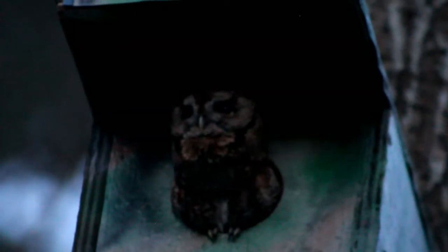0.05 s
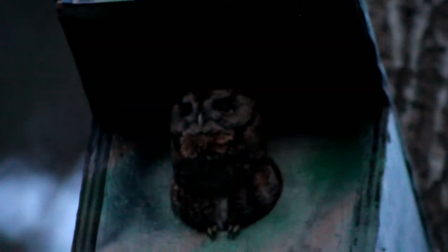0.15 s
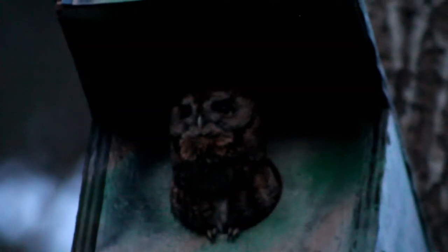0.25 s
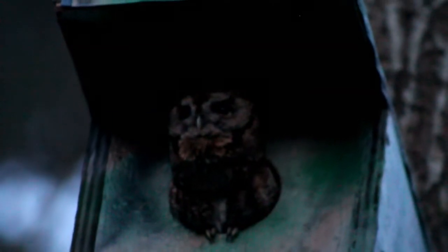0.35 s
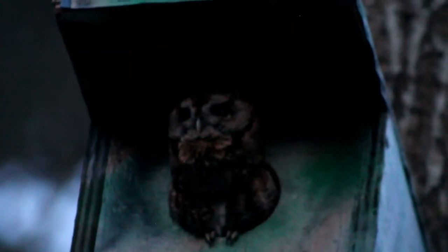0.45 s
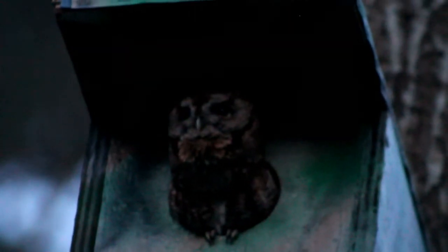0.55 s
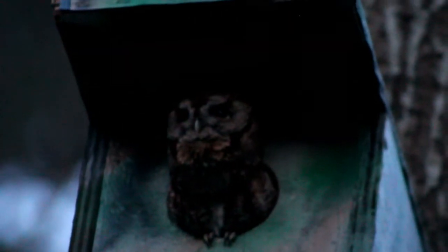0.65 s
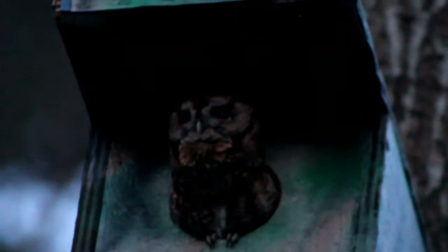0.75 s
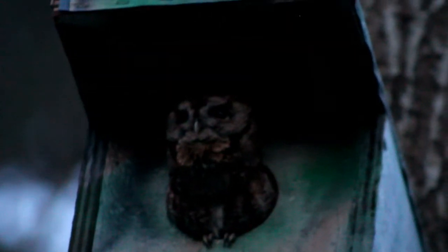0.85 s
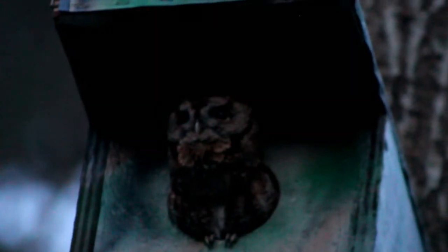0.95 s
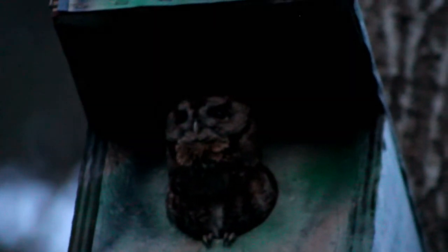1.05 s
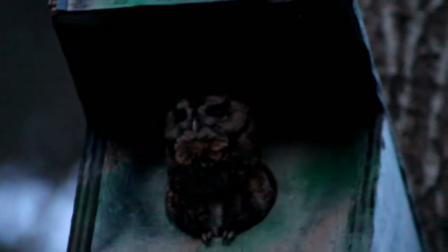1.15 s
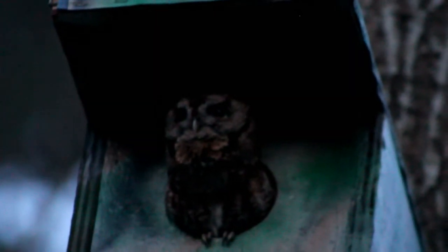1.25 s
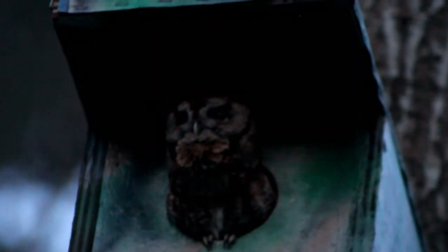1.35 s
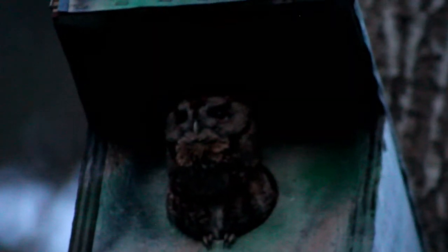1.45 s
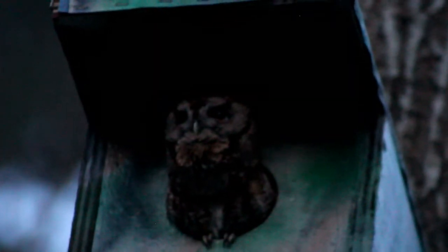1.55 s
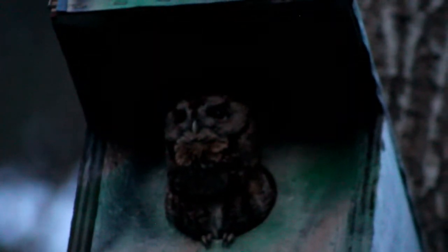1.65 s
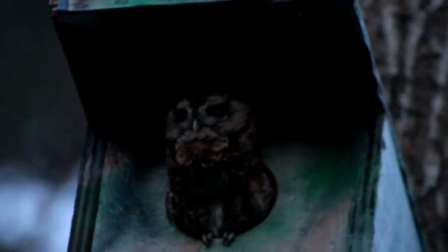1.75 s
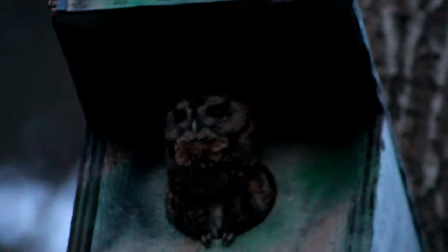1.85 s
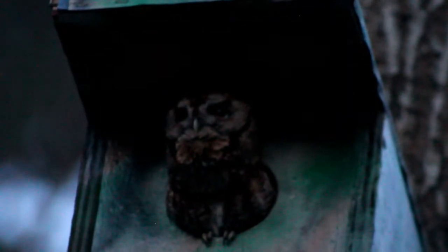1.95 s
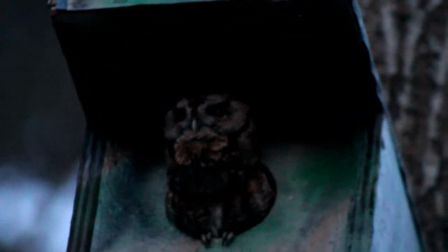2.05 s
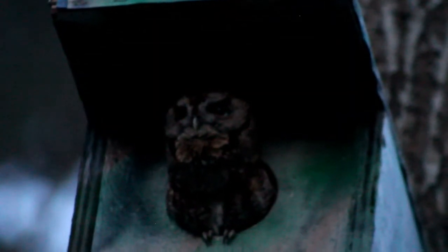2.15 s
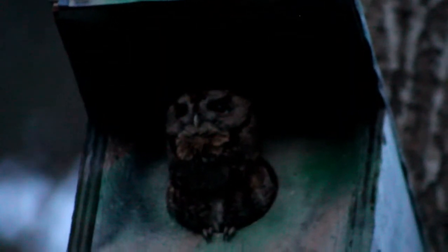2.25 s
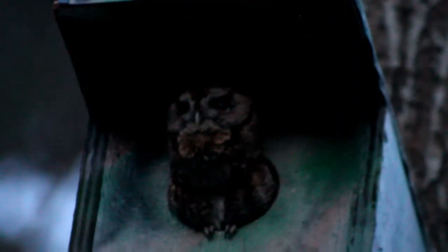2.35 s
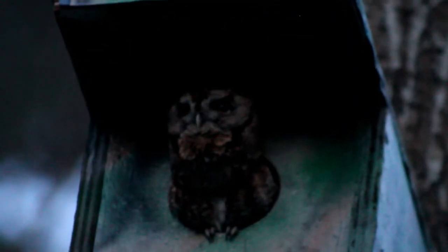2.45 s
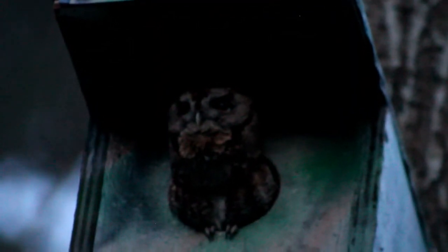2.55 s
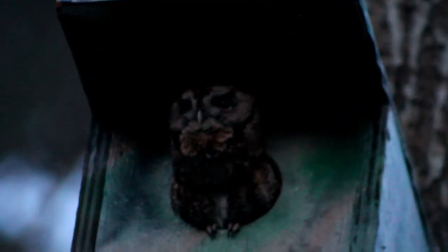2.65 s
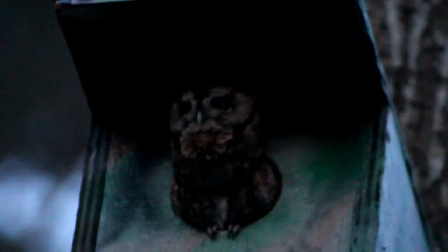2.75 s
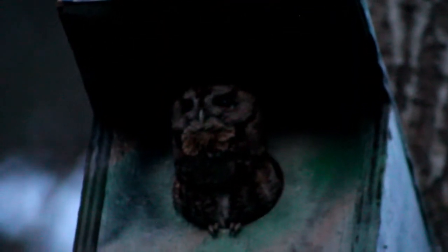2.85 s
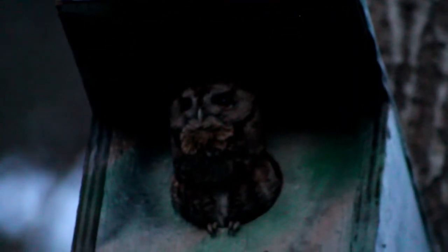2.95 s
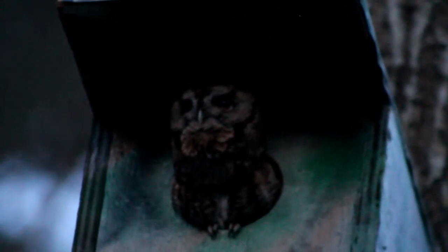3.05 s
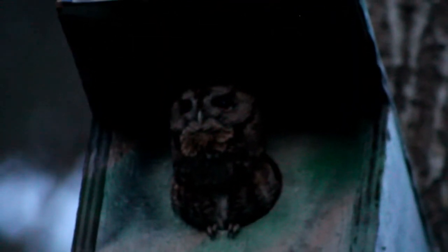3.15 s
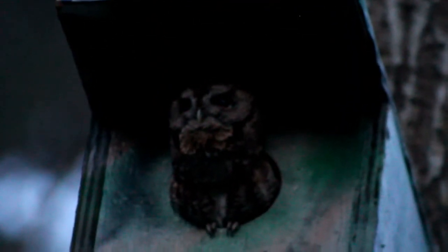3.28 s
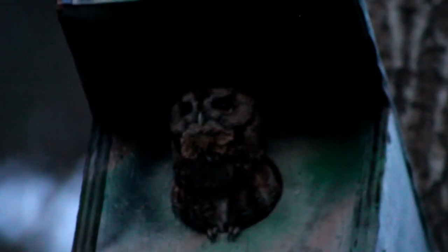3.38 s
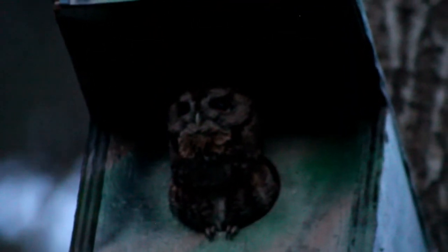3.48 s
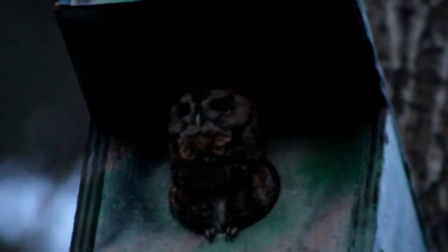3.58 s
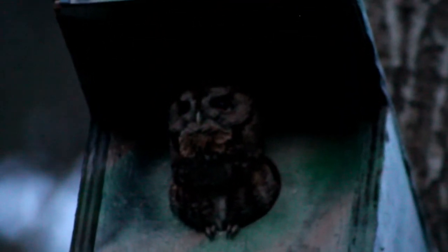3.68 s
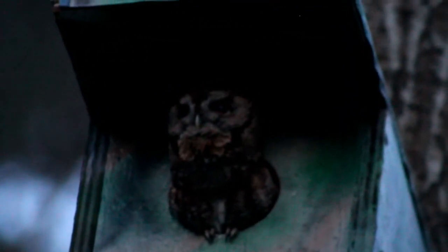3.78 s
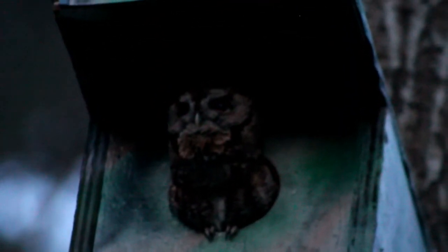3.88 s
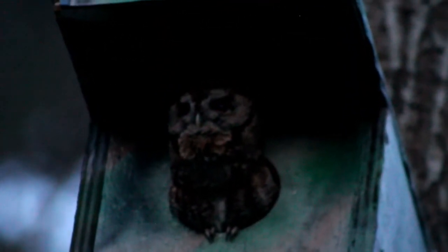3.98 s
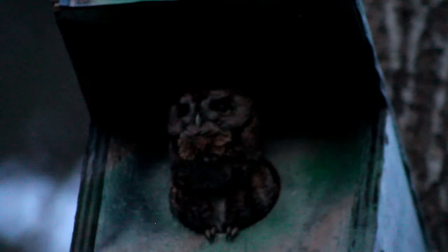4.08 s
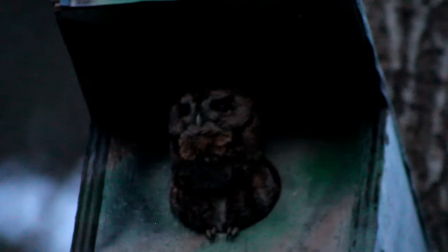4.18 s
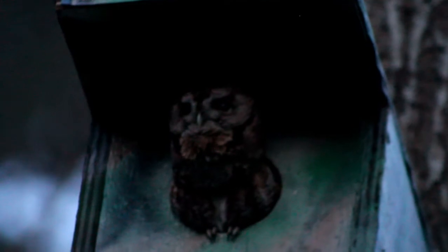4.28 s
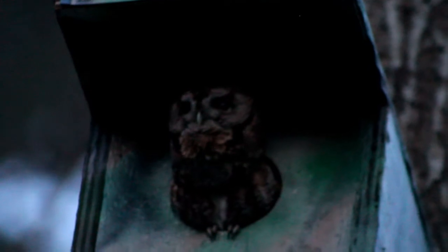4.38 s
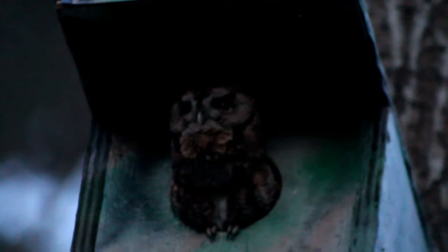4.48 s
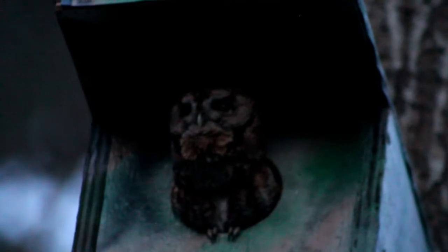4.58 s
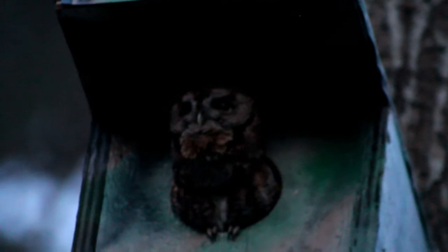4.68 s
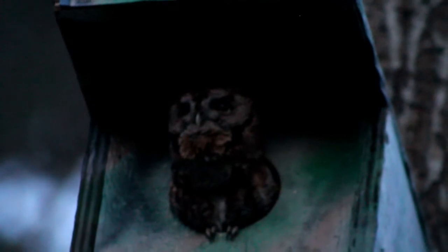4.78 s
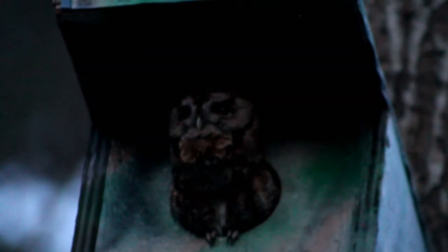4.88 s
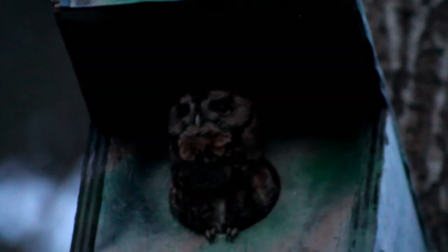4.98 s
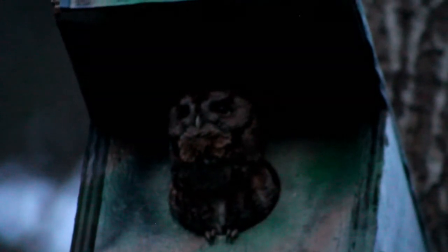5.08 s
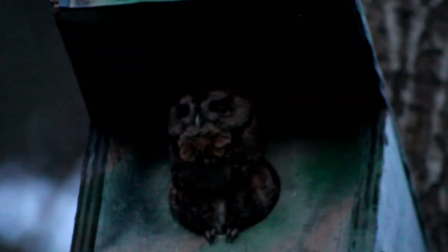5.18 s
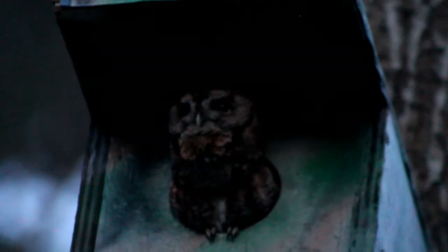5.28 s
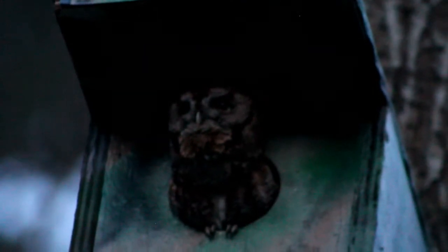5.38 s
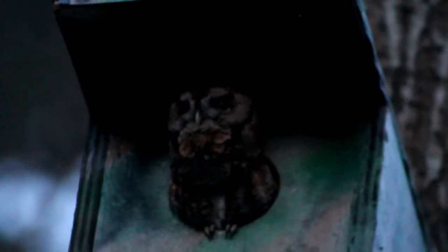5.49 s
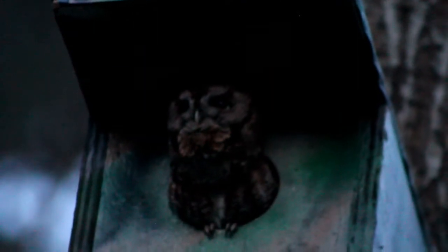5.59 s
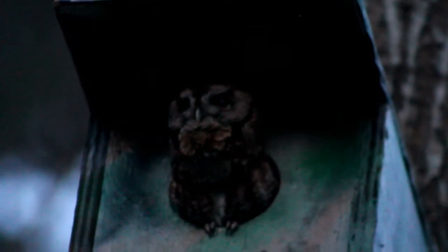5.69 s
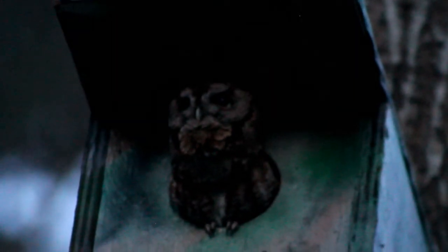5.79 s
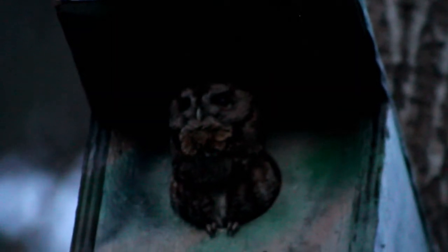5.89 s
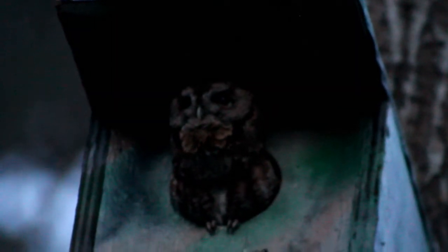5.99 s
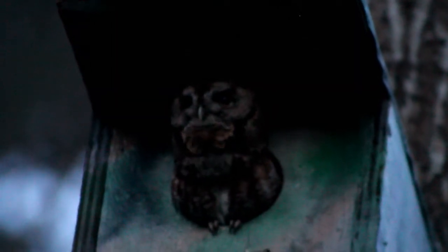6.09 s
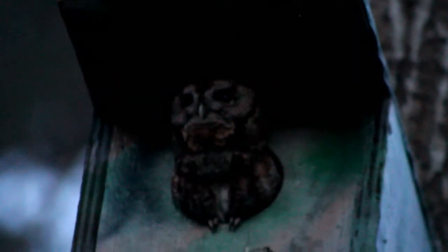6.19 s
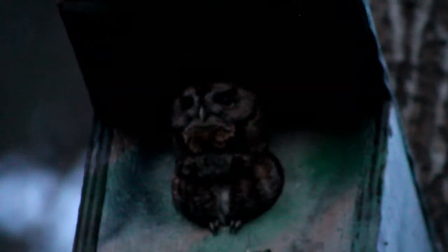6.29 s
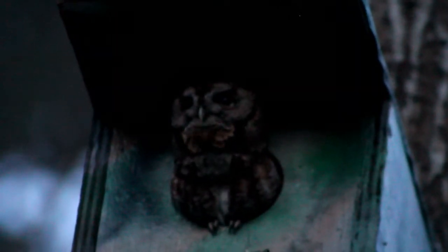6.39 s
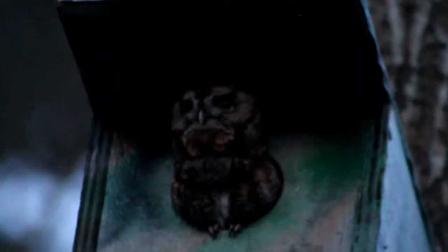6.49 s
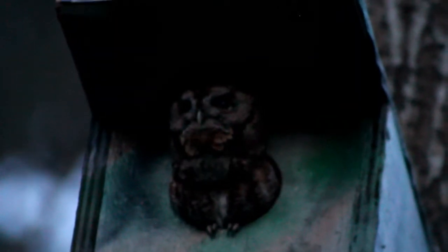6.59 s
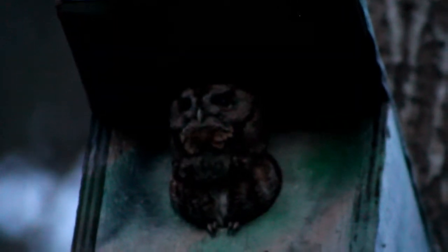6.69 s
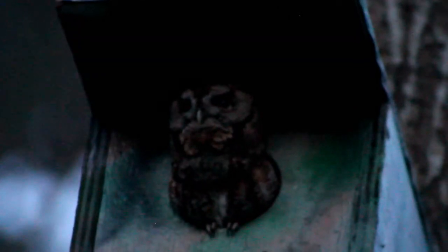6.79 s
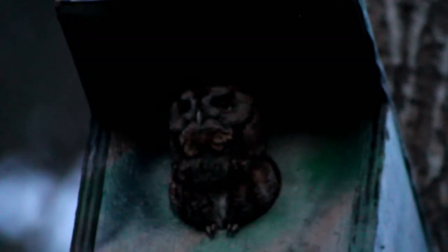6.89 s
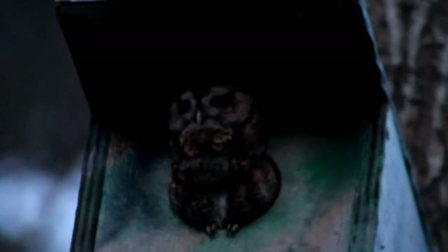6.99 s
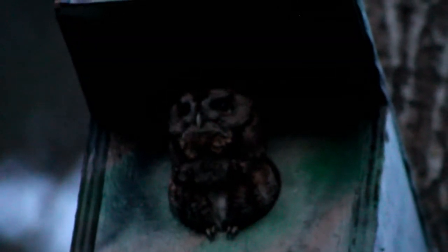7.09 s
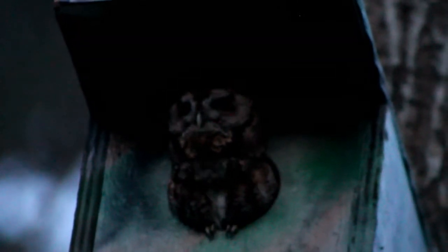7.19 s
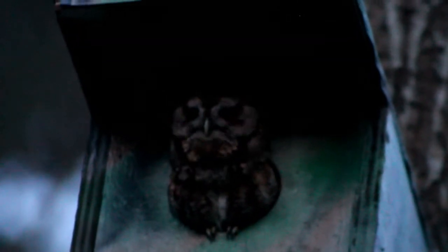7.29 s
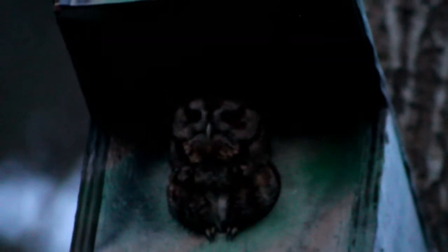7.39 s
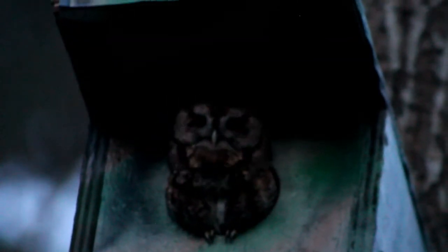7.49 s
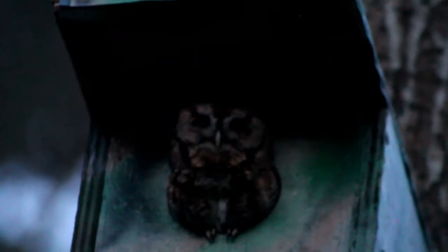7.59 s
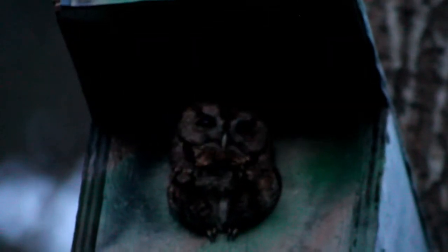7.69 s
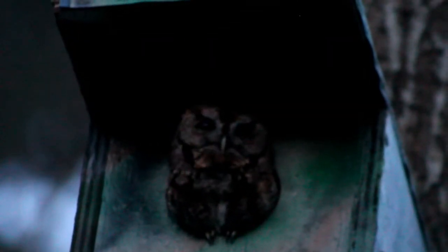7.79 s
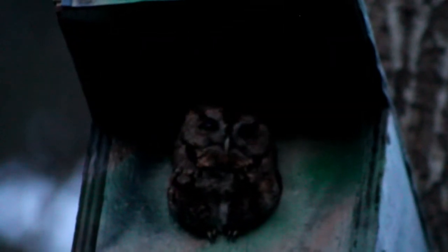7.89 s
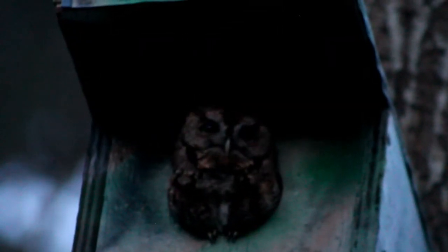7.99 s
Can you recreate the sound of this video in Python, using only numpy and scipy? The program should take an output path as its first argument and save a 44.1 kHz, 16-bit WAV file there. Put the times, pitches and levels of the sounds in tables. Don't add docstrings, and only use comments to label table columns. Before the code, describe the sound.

Soft hollow owl hoots pulse about fourteen a second for six seconds at dusk, over faint traffic hush and thin distant chirps.

```python
import sys
import numpy as np
from scipy import signal
from scipy.io import wavfile
from scipy.ndimage import uniform_filter1d

SR = 44100
rng = np.random.default_rng(int(sys.argv[2]) if len(sys.argv) > 2 else 0)


def gain_from_decibels(decibels):
    exponent = np.asarray(decibels, float) / 20
    return 10 ** exponent


def unload_wav(signal):
    wavfile.write(
        sys.argv[1],
        SR,
        np.round(np.clip(np.atleast_2d(signal).T, -1, 1) * 32767).astype(np.int16),
    )


N = 354563


def evened(x):
    return x / np.sqrt(np.mean(x ** 2) + 1e-20)


def read(points, hz):
    f, value = np.transpose(points)
    return np.interp(np.log(hz + 1), np.log(f + 1), value)


def add(mix, s, sound):
    part = mix[max(round(s * SR), 0):][:len(sound)]
    part += sound[:len(part)]


# f/Hz, density/dB per Hz
AIR_SPECTRUM = [(20, -22), (45, -15.5), (80, -9.5), (130, -8), (220, -2), (330, -5), (620, -1.5),
                (950, -4.5), (1400, -9.5), (2000, -14), (3500, -17), (6000, -20.5), (10500, -29),
                (15500, -41.5)]
# t/s, level/dB, extra level of the road roar/dB
WASH_LEVEL = [(0, -62, -1), (2, -62.5, -1), (4, -62, -1.5), (6, -63, 1.5), (7, -62.5, -0.5),
              (8.1, -63, 0.5)]
# f/Hz, share of the roar [0-1]
ROAR_SHARE = [(250, 0), (500, 0.8), (800, 0.6), (2000, 0.2)]


def wash(patchy_db=0.3):
    size, hop = 2048, 512
    frames, hz = N // hop + 5, np.fft.rfftfreq(size, 1 / SR)
    real, imag, patches = rng.standard_normal((frames, len(hz), 3)).T
    patches = uniform_filter1d(patches, size=20, axis=0)
    patches = evened(uniform_filter1d(patches, size=10, axis=1))
    s, level_db, roar_db = np.transpose(WASH_LEVEL)
    roar = read(ROAR_SHARE, hz)[:, None] * np.interp(np.arange(frames) * hop / SR, s, roar_db)
    spectra = (real + 1j * imag) * gain_from_decibels(read(AIR_SPECTRUM, hz)[:, None] + patchy_db * patches + roar)
    noise = signal.istft(spectra, nperseg=size, noverlap=size - hop)[1][:N]
    return gain_from_decibels(np.interp(np.arange(N) / SR, s, level_db)) * evened(noise)


def drone(rows):
    s, hz, db = np.transpose(rows)
    t = np.arange(N) / SR
    level = gain_from_decibels(np.interp(t, s, db, right=-95)) * np.sqrt(2)
    return level * np.sin(2 * np.pi * np.cumsum(np.interp(t, s, hz)) / SR)


# t/s, firing f/Hz, level/dB
ENGINE_COURSE = [
    (0.0, 90.7, -75),
    (0.93, 92.3, -77.5),
    (1.04, 92.5, -87),
    (1.13, 93, -73),
    (2.44, 95, -78),
    (3.69, 100.4, -76),
    (3.97, 93.7, -77.5),
    (4.32, 80.3, -79),
    (4.92, 78.1, -100),
    (5.0, 75, -83),
]


def engine():
    return drone(ENGINE_COURSE)


# t/s, tone f/Hz, level/dB
MOTOR_COURSE = [
    (0, 122, -84),
    (3.6, 123, -84),
    (3.9, 125, -78.5),
    (5.5, 123, -80.5),
    (5.9, 118, -80),
    (6.8, 117, -82),
    (7, 121, -86),
    (8.04, 121, -87),
]


def motor():
    return drone(MOTOR_COURSE)


def resonate(x, hz, width_hz):
    turn = np.exp(2j * np.pi * np.cumsum(hz * np.ones(len(x))) / SR)
    r = np.exp(-np.pi * width_hz / SR)
    return 2 * (turn * signal.lfilter([1 - r], [1, -r], x / turn)).real


# f/Hz, width/Hz, level/dB
HUM_TONES = [
    (50, 1.5, -88),
    (81, 1.5, -91),
    (10015, 2.5, -107),
]


def hums():
    total = np.zeros(N)
    for hz, width_hz, db in HUM_TONES:
        once = resonate(rng.standard_normal(N), hz, width_hz)
        total += gain_from_decibels(db) * evened(resonate(once, hz, width_hz))
    return total


def scatter(seconds, gap=20):
    slots = round(seconds * SR) // gap
    taps, draw = np.zeros((slots, gap)), rng.random((slots, 2))
    taps[np.arange(slots), (draw[:, 0] * gap).astype(int)] = np.sign(draw[:, 1] - .5)
    return taps.ravel()


def chip(db, from_hz, to_hz, hold, t60, sweep_s=.009, bend=0.56):
    t = np.arange(round(sweep_s * SR)) / SR
    rise = np.sin(bend * t / sweep_s) / np.sin(bend)
    phase = 2 * np.pi * np.cumsum(from_hz + (to_hz - from_hz) * rise) / SR
    sweep = signal.windows.tukey(len(t), .4) * np.sin(phase)
    taps = scatter(.4, gap=60)
    taps = taps * gain_from_decibels(2.7 * rng.standard_normal(len(taps)))
    age = np.arange(len(taps)) / SR
    taps = taps * (1 + 0.26 * np.exp(-age / 0.046))
    cloud = 0
    for part, stay, slow in ((1 - rise ** 2, .75, .75), (rise ** 2, 1.1, 1.3)):
        decay = gain_from_decibels(-60 * (age - hold * stay).clip(0) / (t60 * slow))
        cloud = cloud + signal.fftconvolve(sweep * part, taps * decay)
    return gain_from_decibels(db) * cloud / np.sqrt(np.mean(cloud[:round(hold * SR)] ** 2))


# t/s, level/dB, sweep start f/Hz, sweep end f/Hz, even scatter/s
CHIPS_HEARD = [(.002, -73.5, 5960, 8070, 0.1), (.13, -78, 6940, 7630, .05), (0.686, -70, 5740, 8000, 0.1),
               (1.568, -70.5, 5900, 8040, 0.11), (2.19, -79, 6500, 7850, .06),
               (3.386, -76.5, 6500, 7770, 0.18), (4.985, -77, 5770, 7960, 0.15),
               (5.15, -77, 6460, 7330, 0.065), (5.72, -84, 5360, 6200, 0.071),
               (6.123, -71.5, 6240, 7800, 0.11), (7.362, -69.5, 6060, 8070, 0.12),
               (7.71, -81, 7700, 8600, .07), (7.89, -82.5, 6570, 7500, .1)]
# level/dB, t60/s
CHIP_DECAY = [(-78, .21), (-70, .36)]


def far_birds():
    out = np.zeros(N)
    for s, db, from_hz, to_hz, hold in CHIPS_HEARD:
        t60 = np.interp(db, *np.transpose(CHIP_DECAY))
        add(out, s, chip(db, from_hz, to_hz, hold, t60))
    return out


def ring(hz, db, t60, rise_s):
    t = np.arange(round(.1 * SR)) / SR
    return gain_from_decibels(db - 60 * t / t60) * (1 - np.exp(-t / rise_s)) * np.sin(2 * np.pi * hz * t)


def hoot(db, hz, ms, glide, skew, roundness=1.48):
    onset_hz, onset_ms = 270, 1.5
    octave_db, twelfth_db = -31.8, -43
    t = np.arange(round(ms / 1000 * SR)) / SR
    swell = np.sin(np.pi * (t / t[-1]) ** skew).clip(0) ** roundness
    bend = glide * (.71 * t + .36 * t ** 2 / t[-1]) + onset_hz * np.exp(-1000 * t / onset_ms)
    pitch = hz + bend - np.average(bend, weights=swell ** 2)
    phase = 2 * np.pi * np.cumsum(pitch) / SR
    upper = gain_from_decibels(octave_db) * np.sin(2 * phase) + gain_from_decibels(twelfth_db) * swell * np.sin(3 * phase)
    return gain_from_decibels(db) * swell * (np.sin(phase) + np.sqrt(swell * 2 * t / t[-1]) * upper)


# middle of the hoot t/s, hoot number, effort level/dB, pitch f/Hz
TRILL_COURSE = [(0.0388, 0, -39.1, 794.3), (0.406, 5, -37.6, 797.0), (1.0688, 14, -37.9, 794.5),
                (2.0181, 27, -36.6, 794.7), (2.8909, 39, -37.7, 791.5), (3.1839, 43, -36.7, 792.5),
                (3.914, 53, -37.2, 790.9), (4.6409, 63, -37.3, 788.8), (5.1474, 70, -37.1, 789.7),
                (5.7327, 78, -39.3, 785.5), (5.8809, 80, -41.1, 789.2), (6.031, 82, -41.6, 798.6)]
# hoot number, level/dB
HOOT_ACCENTS = [(4, -0.9), (10, -0.8), (16, -1.4), (17, 1.0), (20, 0.6), (21, -0.8), (28, -0.8), (32, -0.8),
                (33, -0.7), (36, -0.6), (38, 0.6), (40, 0.7), (42, 0.9), (45, -0.7), (51, 0.5), (55, -0.8),
                (63, -0.8), (64, -0.7), (65, 0.9), (66, 0.6), (69, -1.1), (70, -1.1), (71, 0.6), (75, -1.4),
                (76, 1.5)]
# t/s, lean (under 1 is early), length/ms
SWELL_LEAN = [(0, .95, 45), (.45, .88, 44.6), (5.1, .84, 44.5), (5.7, .72, 45.5), (6.04, .8, 49)]
# t/s, level/dB, f/Hz, length/ms, glide/Hz per s, lean
HOOT_WOBBLE = (.0003, .2, 1.0, .9, 120, .045)


def hoots():
    hz_per_db, ms_per_db, glide_hz_per_s = 1.9, 1.0, -1200
    echo_gain_db = .4
    mid_s, number, effort_db, pitch_hz = np.transpose(TRILL_COURSE)
    k = np.arange(number[-1] + 1)
    s, db, hz = (np.interp(k, number, v) for v in (mid_s, effort_db, pitch_hz))
    accents = dict(HOOT_ACCENTS)
    push = np.array([accents.get(n, 0) for n in k])
    when, *shape = np.transpose(SWELL_LEAN)
    lean, ms = (np.interp(s, when, v) for v in shape)
    rows = np.transpose([s, db + push - echo_gain_db, hz + hz_per_db * push, ms + ms_per_db * push,
                         glide_hz_per_s + 0 * s, lean])
    rows = rows + HOOT_WOBBLE * rng.standard_normal(rows.shape)
    lead = rows[:, 3] / 1000 * .5 ** (1 / rows[:, 5]) ** .58
    return np.column_stack([rows[:, 0] - lead, rows[:, 1:]])


# lead on the hoot t/s, f/Hz, level re hoot/dB, t60/s, rise/s
AIRWAY_POP = [(.00173, 714, -9, .016, .0015), (.00226, 1023, -12.5, .03, .0045)]
# delay t/s, level/dB
NEAR_ECHOES = [
    (.01373, -20.5),
    (.0267, -22.3),
]


def owl():
    grove_db, grove_t60 = -27.5, .25
    dry, rows = np.zeros(N), hoots()
    for (s, db, *shape), (size, tune) in zip(rows, rng.random((len(rows), 2))):
        add(dry, s, hoot(db, *shape))
        for lead, hz, pop_db, t60, rise in AIRWAY_POP:
            add(dry, s - lead, ring(hz * (.98 + .04 * tune), db + pop_db + 4 * (size - .5), t60, rise))
    out = dry.copy()
    for delay, db in NEAR_ECHOES:
        add(out, delay, gain_from_decibels(db) * dry)
    t = np.arange(SR // 2 // 20 * 20) / SR
    for k in range(3):
        tail = scatter(.5) * gain_from_decibels(-60 * t / grove_t60) * (t > .022)
        turn = np.sqrt(2 / 3) * np.sin(np.pi * (np.arange(N) / SR / 0.63 + k / 3))
        out += gain_from_decibels(grove_db) * signal.fftconvolve(dry * turn, tail / np.linalg.norm(tail))[:N]
    return out


# t/s, peak level/dB, ring f/Hz, t60/s
CAMERA_TICKS = [
    (.108, -66, 9000, 0.0022),
    (2.336, -67, 11000, .002),
    (2.6685, -48, 634, .04),
    (3.397, -68, 11000, 0.0018),
    (4.301, -63, 11000, .002),
    (4.752, -52, 9500, 0.0022),
    (4.7522, -60, 12500, .002),
    (7.231, -49.5, 900, 0.016),
]


def camera_ticks():
    out = np.zeros(N)
    for s, db, hz, t60 in CAMERA_TICKS:
        add(out, s, ring(hz, db, t60, rise_s=.0001))
    return out


# f/Hz, level/dB, t60/s
KNOCK_MODES = [
    (178, -41, .036),
    (290, -46, .025),
    (1500, -52, .012),
]


def camera_knock():
    out = np.zeros(N)
    knock = -sum(ring(hz, db, t60, rise_s=.001) for hz, db, t60 in KNOCK_MODES)
    add(out, 2.6709, signal.lfilter(*signal.butter(2, 100, "high", fs=SR), knock))
    return out


def scene():
    floor = wash() + engine() + motor() + hums()
    mix = floor + far_birds() + owl() + camera_ticks() + camera_knock()
    return mix[None]


def top_cut(x):
    return signal.sosfilt(signal.butter(12, 15600, fs=SR, output="sos"), x)


def record(dry):
    return top_cut(dry)


dry = scene()
out = record(dry)
unload_wav(out)
```